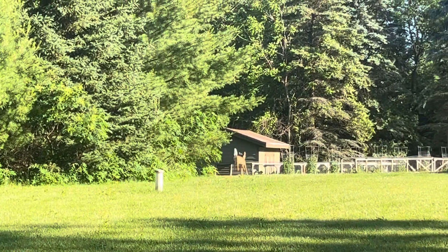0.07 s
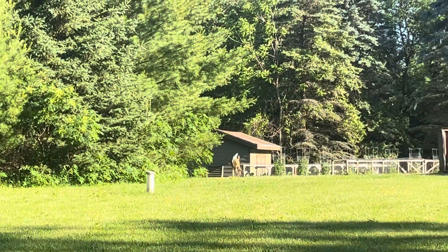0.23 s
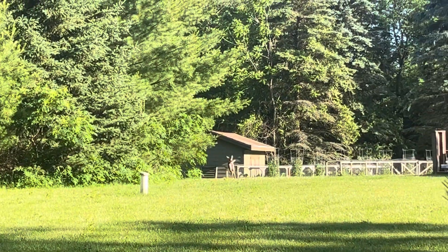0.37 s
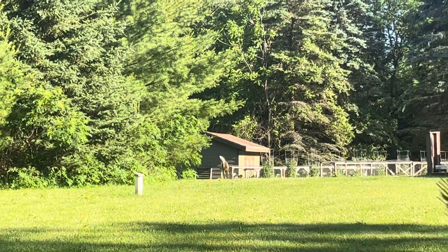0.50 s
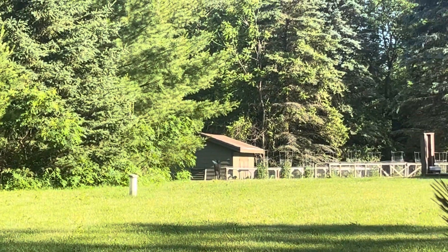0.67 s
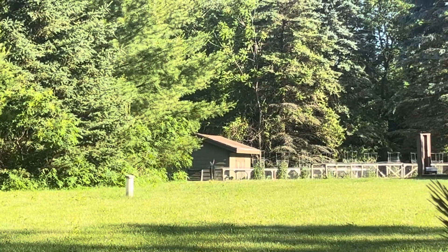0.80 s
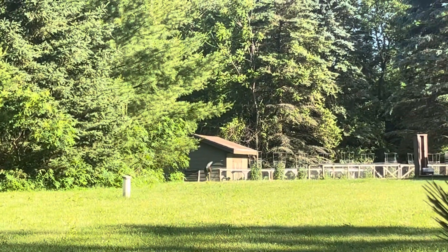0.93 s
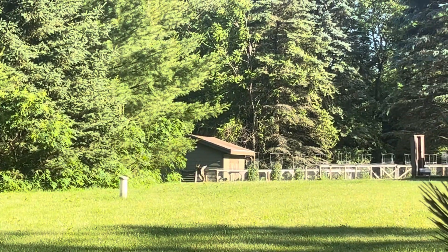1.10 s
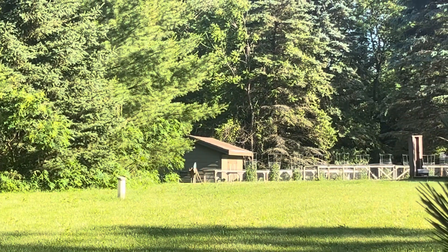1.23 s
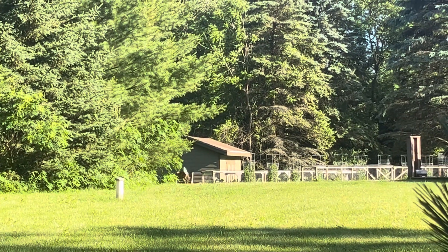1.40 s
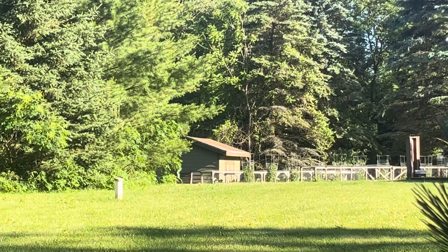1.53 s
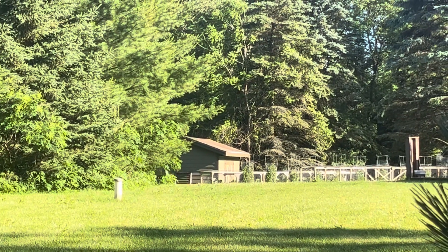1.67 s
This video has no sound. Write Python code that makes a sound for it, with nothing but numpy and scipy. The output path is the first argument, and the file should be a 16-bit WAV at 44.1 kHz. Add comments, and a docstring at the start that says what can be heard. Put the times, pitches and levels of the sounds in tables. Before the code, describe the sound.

Close to a handheld microphone on a quiet lawn, a harsh bird-like squawk sounds twice with a short gap, over low motor hum and leaf hiss, followed by thin chirps, dull ticks and a rubbing rustle.

```python
"""Over the hiss of leaves and a distant motor's hum, a far songbird whistles and something ticks near the microphone.
An animal close by calls, nasal and harsh: a muffled creaky start, the mouth opens, the pitch sags.
A bird whistle and a tick follow, then a second call. Two bird swoops and more ticks come after; a rustle ends it.
Leaves and rub are banded noise, hum and knocks are resonators, whistles are gliding sines;
the calls are stacks of partials under a moving mouth resonance, plus creak pulses."""
import sys
import numpy as np
from scipy import signal
from scipy.fft import rfft, irfft, next_fast_len
from scipy.io import wavfile

SR = 44100
rng = np.random.default_rng(int(sys.argv[2]) if len(sys.argv) > 2 else 0)


def output_pcm(signal):
    """Save a mono or channel-first signal as 16-bit PCM at the path in sys.argv[1].

    Samples are clipped to [-1, 1] before scaling.
    """
    pcm = np.clip(np.atleast_2d(signal).T, -1, 1) * 32767
    wavfile.write(sys.argv[1], SR, np.round(pcm).astype(np.int16))


def invert_db(level):
    """Linear amplitude ratio for a level in decibels (20 dB per decade), elementwise."""
    return 10 ** (np.asarray(level, dtype=float) / 20)


N = 77175


def rms_one(x):
    """Scale to rms 1."""
    return x / np.sqrt(np.mean(x ** 2) + 1e-20)


def in_time(rows):
    """Columns of a table joined by straight lines, sample by sample."""
    s, *columns = np.transpose(rows)
    return [np.interp(np.arange(N) / SR, s, c) for c in columns]


def inside(start_s, end_s, edge_s=0.0035):
    """One between two times, with short ramps."""
    return np.interp(np.arange(N) / SR, [start_s, start_s + edge_s, end_s - edge_s, end_s], [0, 1, 1, 0])


def at_hz(points, hz, axis=1):
    """A column of a table on a log-frequency axis."""
    points = np.array(points, float)
    return np.interp(np.log(hz + 1), np.log(points[:, 0] + 1), points[:, axis])


def soft(x, cutoff_hz):
    """A soft contact: the top is cut."""
    return signal.sosfilt(signal.butter(4, cutoff_hz, fs=SR, output="sos"), x)


def slow(cutoff_hz):
    """Low-passed noise of rms 1."""
    return rms_one(soft(rng.standard_normal(N + 8000), cutoff_hz)[8000:])


def ring(x, hz, t60_s):
    """Resonator: a unit click sets a sine of height one ringing."""
    radius = invert_db(-60 / (t60_s * SR))
    w = 2 * np.pi * hz / SR
    return signal.lfilter([0, np.sin(w)], [1, -2 * radius * np.cos(w), radius * radius], x + 1e-18)


# left-right likeness of the noises: (band_hz, likeness)
LIKENESS = [(60, 0.7), (110, 0.74), (200, 0.3), (360, 0.26), (650, 0.069), (1190, 0.27), (2160, 0.47),
            (3930, 1)]


def banded_noise(spectrum, patchy_db):
    """Third-octave bands of stereo noise with their own level, flicker and likeness; rms 1."""
    out = 0
    edges_hz = 25 * 2 ** (np.arange(28) / 3)
    white = rng.standard_normal((2, 2, N))
    flicker = [slow(7.1), slow(31), slow(26)]
    for k, (low_hz, high_hz) in enumerate(zip(edges_hz, edges_hz[1:])):
        band = signal.butter(2, [low_hz, high_hz], "band", fs=SR, output="sos")
        mid, side = signal.sosfilt(band, white[k % 2])
        hz = np.sqrt(low_hz * high_hz)
        alike = np.clip(at_hz(LIKENESS, hz), -1, 1)
        gain = invert_db(at_hz(spectrum, hz) + patchy_db * flicker[k % 3])
        out = out + gain * (np.sqrt(1 + alike) * mid + np.sqrt(1 - alike) * side * [[1], [-1]])
    return rms_one(out)


# hiss of leaves, spectrum: (band_hz, relative_db)
LEAVES_SPECTRUM = [(25, -63.5), (38, -33), (55, -7.5), (98, -5), (124, -14), (199, -13.5), (240, -21.5),
                   (288, -31), (400, -17), (494, -23), (713, -27), (1360, -29), (2060, -30), (2550, -39.5),
                   (3500, -42), (4380, -58.5), (5690, -71.5), (8000, -70.5), (12000, -76.5)]
# hiss of leaves, level: (time_s, level_db)
LEAVES_LEVEL = [(0, -46.5), (0.1, -53.5), (0.55, -50), (0.8, -51), (1.1, -51.5), (1.75, -50.5)]


def leaves():
    """Hiss of leaves: banded noise under a drifting level."""
    level_db, = in_time(LEAVES_LEVEL)
    return invert_db(level_db) * banded_noise(LEAVES_SPECTRUM, patchy_db=1.5)


# motor tones, level as at mid-scene: (pitch_hz, width_hz, level_db)
HUM = [(95.36, 5.5, -48), (166.4, 3.3, -55), (194.4, 2.5, -58), (292, 24, -67)]
HUM_FADE_DB_PER_S = 1.5


def hum():
    """Wavering low tones of a distant motor: noise through narrow resonators."""
    out = 0
    for pitch_hz, width_hz, level_db in HUM:
        tone = ring(rng.standard_normal(N + SR), pitch_hz, 2.3 / width_hz)[SR:]
        out = out + invert_db(level_db) * rms_one(tone)
    return out * invert_db(-HUM_FADE_DB_PER_S * (np.arange(N) - N / 2) / SR)


# whistles, one list each: (time_s, pitch_hz, level_db)
CHIRPS = [
    [(0.006, 1898, -64), (0.014, 1943, -47), (0.04, 1640, -61), (0.046, 1590, -67), (0.055, 1550, -70.5)],
    [(0.54, 2555, -73), (0.566, 2850, -67.5), (0.572, 2750, -69), (0.648, 2495, -68), (0.664, 2590, -67),
     (0.675, 2550, -68.5)],
]
SWOOPS = [
    [(1.115, 2516, -69), (1.127, 2790, -69), (1.139, 2996, -65), (1.163, 2490, -61.5), (1.185, 2380, -75)],
    [(1.575, 3276, -78), (1.583, 3250, -66), (1.593, 3130, -74), (1.607, 3030, -64), (1.615, 2610, -54.5)],
]
FLUTTER_RMS_DB = 5   # leaves between make the whistles flutter


def songbirds():
    """Thin gliding sine whistles."""
    out = 0
    for rows in CHIRPS + SWOOPS:
        pitch_hz, level_db = in_time(rows)
        level = invert_db(level_db + FLUTTER_RMS_DB * slow(60)) * inside(rows[0][0], rows[-1][0], edge_s=0.0027)
        out = out + np.sqrt(2) * level * np.sin(2 * np.pi * np.cumsum(pitch_hz) / SR)
    return out


# echoes from trees: (earliest_delay_s, level_db)
ECHOES = [(0.034, -52), (.062, -55)]


def trees(voice):
    """Faint echoes of the voice's ringing band, each smeared into six taps, alternating sides."""
    band = signal.butter(2, [1600, 4200], "band", fs=SR, output="sos")
    ringing = signal.sosfilt(band, voice)
    out = np.zeros((2, N))
    for delay_s, level_db in ECHOES:
        lags = ((delay_s + rng.uniform(0, 0.061, 6)) * SR).astype(int)
        for tap, lag in enumerate(lags):
            out[tap % 2, lag:] += invert_db(level_db) * ringing[:N - lag]
    return out


# knocks: (start_s, click_db, pitch_hz, t60_s)
TICKS = [(0.013, -43, 1840, 0.017), (0.796, -55.5, 965, 0.025), (1.2329, -44, 1437, .018),
         (1.2544, -47, 1406, 0.017), (1.2614, -43.5, 1500, 0.013), (1.611, -48.5, 540, 0.1),
         (1.6285, -40.5, 1612, 0.083), (1.635, -44, 1597, .05), (1.647, -39, 1300, .025),
         (1.654, -42, 1620, 0.021)]
# modes of a knock: (pitch_ratio, level_db, t60_ratio)
TICK_MODES = [(.35, -4.5, .4), (.62, -3, 0.77), (1.0, 0.5, 1.0), (1.6, -11, .4)]


def ticks():
    """Small dull knocks: a click rings four modes."""
    out = 0
    for start_s, click_db, pitch_hz, t60_s in TICKS:
        click = np.zeros(N)
        click[int(start_s * SR)] = invert_db(click_db)
        for pitch_ratio, level_db, t60_ratio in TICK_MODES:
            out = out + invert_db(level_db) * ring(click, pitch_hz * pitch_ratio, t60_s * t60_ratio)
    return soft(out, 4400)


# rub, spectrum: (band_hz, relative_db)
RUSTLE_SPECTRUM = [(35, -41), (60, -5), (140, 5), (243, -26.5), (508, -10), (630, -17), (840, -11.5),
                   (1440, -20), (2020, -20.5), (3200, -26), (4380, -30), (5690, -73.5), (11000, -82.5)]
# rub, level: (time_s, level_db)
RUSTLE_LEVEL = [(1.605, -71), (1.615, -47), (1.64, -41.5), (1.665, -40.5), (1.7, -47.5), (1.75, -47.5)]
HOLLOW_HZ, HOLLOW_T60_S, HOLLOW_REL_DB = 1550, 0.026, -14.5
RUB_LUMPY_RMS_DB = 2


def rustle():
    """A rub swells quickly and fades; one hollow resonance sings in it."""
    level_db, = in_time(RUSTLE_LEVEL)
    hollow = ring(rng.standard_normal(N), HOLLOW_HZ, HOLLOW_T60_S)
    hollow = ring(hollow, HOLLOW_HZ, HOLLOW_T60_S)
    rub = banded_noise(RUSTLE_SPECTRUM, patchy_db=2.0) + invert_db(HOLLOW_REL_DB) * rms_one(hollow)
    level = invert_db(level_db + RUB_LUMPY_RMS_DB * slow(66.5))
    return inside(RUSTLE_LEVEL[0][0], 2) * level * rub   # still sounding at the end


# mouth resonance, also used by call(): (time_s, resonance_hz)
MOUTH = [(0.14, 1008), (0.19, 1189), (0.235, 1520), (0.255, 2124), (0.31, 1980), (0.39, 1953), (0.44, 1952),
         (0.46, 2010), (0.49, 1954), (0.83, 1028), (0.872, 1053), (0.88, 1279), (0.885, 1536), (0.89, 1703),
         (0.94, 1904), (1.01, 1859), (1.09, 2048)]
MOUTH_T60_S, MOUTH_RISE_S = 0.022, 0.0008
# throat resonances: (resonance_hz, level_db, t60_s)
THROAT = [(455, -23.5, 0.0027), (706, -4, 0.02), (1120, 8.5, 0.0073), (2060, -14.5, .012), (3400, -27, .02),
          (4480, -27.5, 0.02)]
THROAT_SOFT = 1.2   # top of the knock, as a multiple of each throat resonance
# the voice catches or fails: (start_s, end_s, pulse_db, throat_share_db)
CREAKS = [(0.145, 0.173, -41.5, -2.5), (0.166, 0.179, -45.5, -3), (0.8365, 0.848, -36.5, -2),
          (0.8483, 0.865, -31.5, 3.5), (0.88, 0.89, -12.5, -29.5), (0.453, 0.491, -32.5, -15.5),
          (1.06, 1.079, -30.5, -13)]
CREAK_PER_S, CREAK_UNEVEN = 200, 0.07   # pulse rate; rms of the interval, as a share


def creak():
    """Slow uneven pulses knock through throat and mouth where the voice catches or fails."""
    clicks, deep = np.zeros(N), np.zeros(N)
    for start_s, end_s, pulse_db, throat_share_db in CREAKS:
        luck = rng.standard_normal((12, 2))
        intervals = np.clip(1 + CREAK_UNEVEN * luck[:, 0], 0.5, 2)
        pulse_s = start_s + (np.cumsum(intervals) - 1) / CREAK_PER_S
        pulse_s[0] = start_s
        at = (pulse_s[pulse_s <= end_s] * SR).astype(int)
        clicks[at] = -invert_db(pulse_db + 2.0 * luck[:len(at), 1])
        deep[at] = clicks[at] * invert_db(throat_share_db)
    out = np.zeros(N)
    for hz, level_db, t60_s in THROAT:
        out += invert_db(level_db) * ring(soft(deep, THROAT_SOFT * hz), hz, t60_s)
    mouth_hz, = in_time(MOUTH)
    t = np.arange(1500) / SR
    mouth_swell = (1 - np.exp(-t / MOUTH_RISE_S)) ** 2 * invert_db(-60 * t / MOUTH_T60_S)
    for i in np.flatnonzero(clicks):
        out[i:i + 1500] += clicks[i] * mouth_swell * np.sin(2 * np.pi * mouth_hz[i] * t)
    return soft(soft(out, 6800), 7000)


# the two calls, pitch: (time_s, pitch_hz)
PITCH_A = [(0.138, 360), (0.15, 374), (0.158, 325), (0.168, 381), (0.177, 417.3), (0.194, 370.5),
           (0.208, 400.7), (0.225, 412.7), (0.24, 428.3), (0.255, 429), (0.27, 438), (0.285, 427.7),
           (0.3, 419.2), (0.32, 420), (0.338, 414.7), (0.352, 405.5), (0.368, 400.5), (0.385, 390.2),
           (0.4, 386.6), (0.418, 390.8), (0.432, 381.3), (0.445, 373.4), (0.46, 352), (0.47, 319.8),
           (0.48, 288.8), (0.5, 292.3)]
PITCH_B = [(0.832, 365), (0.856, 356.2), (0.87, 396.3), (0.885, 407.5), (0.895, 417.6), (0.905, 421.3),
           (0.92, 432.9), (0.94, 447.3), (0.952, 442.2), (0.96, 433.2), (0.979, 435), (0.995, 434.3),
           (1.013, 423), (1.022, 410.3), (1.032, 388.9), (1.045, 351.4), (1.058, 301.8), (1.075, 280.6),
           (1.09, 271.7)]
# the two calls, effort: (time_s, effort_db, opening_db, rasp_db); opening_db lifts the voice colour
CALL_A = [(0.138, -59.5, -18, -16), (0.15, -41, -12.5, -21.5), (0.16, -45, -20, -23),
          (0.176, -31.5, -15, -15.5), (0.196, -33, -8, -14), (0.22, -26, -9, -31), (0.243, -25.5, -11, -22),
          (0.254, -27.5, 4.5, -21.5), (0.275, -27, 7, -21), (0.29, -28, 13, -25.5), (0.34, -29, 17, -33),
          (0.396, -34.5, 18.5, -27), (0.436, -32.5, 16.5, -26), (0.458, -35, 13.5, -10),
          (0.476, -43.5, 12.5, -29), (0.488, -70.5, 29.5, -7.5), (0.5, -84.5, 6.5, -14)]
CALL_B = [(0.832, -69, -14.5, -15.5), (0.84, -43.5, -8, -9.5), (0.858, -42, -5.5, -18),
          (0.868, -31, -4, -19.5), (0.877, -31, -2.5, -22), (0.882, -39, 19, -32), (0.89, -36, 24.5, -25),
          (0.903, -34, 21, -25), (0.94, -31, 21.5, -28.5), (0.965, -33, 22.5, -17.5),
          (0.985, -30.5, 18.5, -28), (1.012, -32.5, 21, -29), (1.03, -35.5, 24.5, -32.5),
          (1.042, -37, 15.5, -22), (1.054, -45, 22, -18), (1.07, -53, 8, -10.5), (1.09, -71.5, 19.5, -14)]
# voice colour without the mouth ring: (partial_hz, level_db at opening 0, share of opening_db added)
VOICE = [(387, 0, 0.0072), (806, -7.5, 0.42), (1330, -10, 0.79), (1750, -15, 1.124), (2075, -8, 1.076),
         (2470, -8.5, 0.48), (3220, -23, 0.47), (3490, -20.5, 0.39), (3730, -28.5, 0.43),
         (4563, -31.5, 0.38), (4660, -52, .6), (5140, -51, 0.19), (5630, -84.5, 0.5), (6860, -77, 0.95),
         (7460, -58.5, 0.4), (8100, -60.5, 0.98), (8900, -69.5, 0.43), (10200, -73, .6), (11000, -56, .6),
         (12750, -60.5, 0.92), (13840, -59, .6), (15200, -45, 0.5), (16000, -48, .6)]
# resonances that hold part of each pulse back: (shut_hz, open_hz, width_hz, shut_rad, open_rad)
LAGS = [(680, 600, 500, 1.4, 1.6), (1830, 1830, 240, 0, 1.35)]
SHUT_DB, OPEN_DB = -8, 6   # opening_db at which the mouth counts as shut, as open
RING_DB, RING_WIDTH_HZ = 9, 230
RING_DB_PER_SAG_HZ, SAG_FROM_HZ = 0.0886, 370   # the open mouth's ring sharpens as the pitch sags
NASAL_DIP_HZ, NASAL_DIP_WIDTH_HZ, NASAL_DIP_DB = 3240, 880, -19   # the nose swallows this, mouth shut
WAVER_CUTOFF_HZ, WAVER_RMS_DB, WAVER_RMS_RAD = 45, 3, 1.6   # upper partials come and go, slip out of step
WAVER_SPAN_HZ = 3000   # from first to full waver
RASP_CUTOFF_HZ, RASP_UNITY_HZ = 405, 1810   # rasp grows with partial frequency; rasp_db holds at unity
JITTER = 0.0035   # rms share of the pitch
PARTIAL_TOP_HZ = 15760


def call(pitch, rows):
    """Steady pulses as a stack of partials, coloured by the opening mouth, with rasp."""
    pitch_hz, = in_time(pitch)
    effort_db, opening_db, rasp_db = in_time(rows)
    mouth_hz, = in_time(MOUTH)
    wavers = [slow(WAVER_CUTOFF_HZ) for _ in range(5)]
    on = inside(rows[0][0], rows[-1][0])
    part = on > 0
    phase = 2 * np.pi * np.cumsum(pitch_hz * (1 + JITTER * slow(72))) / SR
    rasps = invert_db(rasp_db) * [slow(RASP_CUTOFF_HZ), slow(RASP_CUTOFF_HZ)]
    opened = np.clip((opening_db[part] - SHUT_DB) / (OPEN_DB - SHUT_DB), 0, 1)
    sag_hz = np.maximum(SAG_FROM_HZ - pitch_hz[part], 0)
    ring_db = RING_DB + RING_DB_PER_SAG_HZ * sag_hz * opened
    out = np.zeros(N)
    for k in range(1, 44):
        hz = k * pitch_hz[part]
        level_db = at_hz(VOICE, hz) + at_hz(VOICE, hz, axis=2) * opening_db[part]
        level_db += ring_db / (1 + ((hz - mouth_hz[part]) / (RING_WIDTH_HZ / 2)) ** 2)
        nasal_offset = 2 * (hz - NASAL_DIP_HZ) / NASAL_DIP_WIDTH_HZ
        level_db += NASAL_DIP_DB * (1 - opened) / (1 + nasal_offset ** 2)
        level_db += WAVER_RMS_DB * np.clip(hz / WAVER_SPAN_HZ - 0.5, 0, 1) * wavers[k % 5][part]
        turn = k * phase[part]
        for shut_hz, open_hz, width_hz, shut_rad, open_rad in LAGS:
            centre_hz = shut_hz + (open_hz - shut_hz) * opened
            depth_rad = shut_rad + (open_rad - shut_rad) * opened
            turn -= depth_rad * (np.pi / 2 + np.arctan(2 * (hz - centre_hz) / width_hz))
        turn += WAVER_RMS_RAD * np.clip(hz / WAVER_SPAN_HZ - 0.7, 0, 1) * wavers[(2 * k + 1) % 5][part]
        rough = np.clip(hz / RASP_UNITY_HZ, 0, 3) * rasps[:, part]
        partial = (1 + rough[0]) * np.cos(turn) + rough[1] * np.sin(turn)
        out[part] += invert_db(level_db) * (hz < PARTIAL_TOP_HZ) * partial
    return -np.sqrt(2) * on * invert_db(effort_db) * out


# left port over right port, strength: (hz, ratio_db)
PORT_DB = [(60, -3), (150, -10.5), (240, -7.5), (400, -8), (600, -10), (800, -2), (1100, -5), (1500, -2),
           (1850, 2.5), (2100, -4), (2850, 0), (3900, 3), (5000, -4.5), (12000, 0.5)]
# left port ahead of right port, phase: (hz, lead_rad)
PORT_LEAD = [(0, 1), (340, 1), (690, 1.26), (1550, 0.96), (1810, 0.38), (2150, .5), (2760, 0.8),
             (3450, 2.5), (4130, 0.54), (6000, 0.8), (8000, 1.3), (11000, 1.66), (16000, 3.5)]


def ports(x):
    """A near source reaches the two microphone ports with unlike strength and phase."""
    size = next_fast_len(N + 4096)
    hz = np.arange(size // 2 + 1) * SR / size
    lead_rad = np.interp(hz, *np.transpose(PORT_LEAD))
    ratio = invert_db(at_hz(PORT_DB, hz)) * np.exp(1j * lead_rad)
    right = 2 * rfft(x, size) / (1 + ratio)   # the mean of both ports stays x
    return irfft([ratio * right, right], size)[:, :N]


AROUND_PAN_DB = -1.06   # left gain; the right gets the opposite


def scene():
    """Calls at the ports, over leaves, motor, birds, echoes, ticks and rustle."""
    voice = call(PITCH_A, CALL_A) + call(PITCH_B, CALL_B) + creak()
    around = leaves() + hum() + songbirds() + trees(voice) + ticks() + rustle()
    return ports(voice) + around * invert_db(np.array([[AROUND_PAN_DB], [-AROUND_PAN_DB]]))


def top_cut(x):
    """Nothing passes above the cut-off."""
    return signal.sosfilt(signal.butter(12, 15760, fs=SR, output="sos"), x)


LOW_CUT_HZ = 36


def record(dry):
    """A low cut finishes the mix."""
    low_cut = signal.butter(2, LOW_CUT_HZ, "high", fs=SR, output="sos")
    mix = signal.sosfilt(low_cut, dry)
    return top_cut(mix)


dry = scene()
out = record(dry)
output_pcm(out)
```